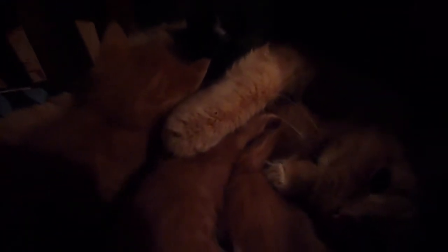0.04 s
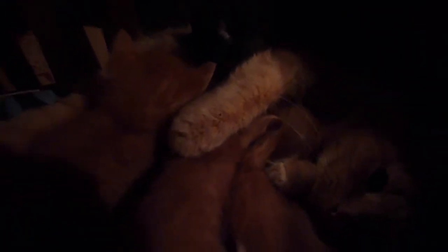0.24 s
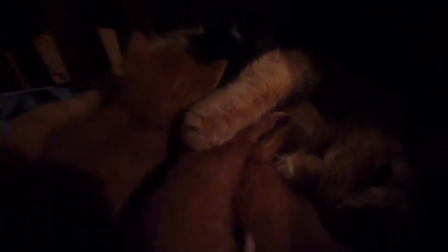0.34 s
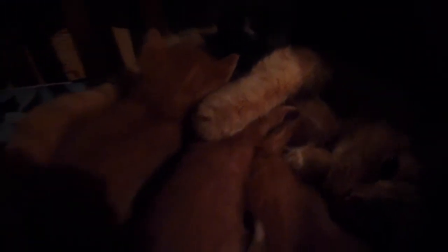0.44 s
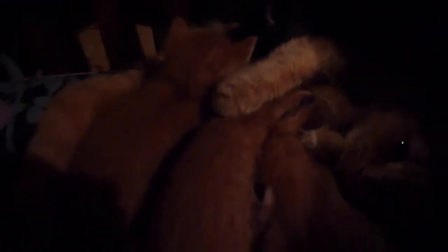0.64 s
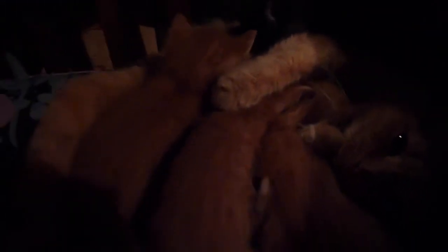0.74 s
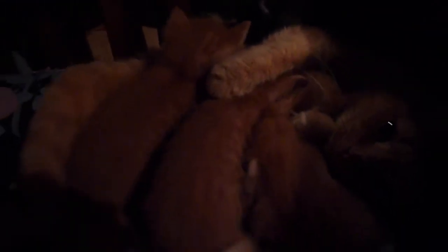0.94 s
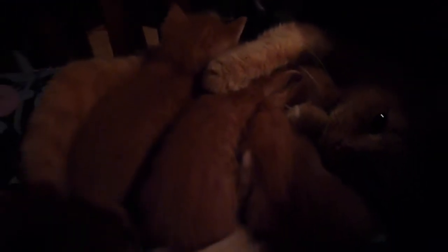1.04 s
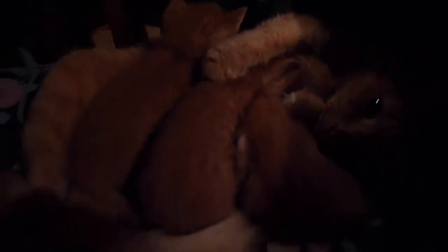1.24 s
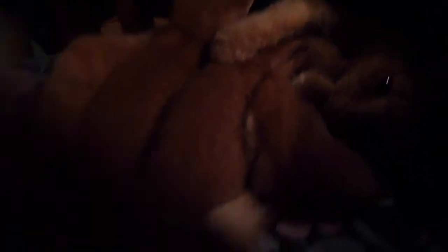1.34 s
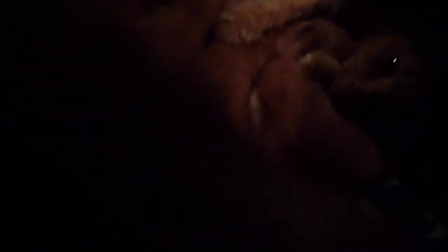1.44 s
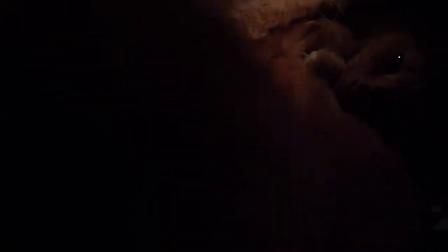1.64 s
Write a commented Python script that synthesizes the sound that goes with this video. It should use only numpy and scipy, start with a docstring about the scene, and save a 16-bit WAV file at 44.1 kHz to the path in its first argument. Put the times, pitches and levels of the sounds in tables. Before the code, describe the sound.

A kitten's single high mew starts at about 0.2 s with a slight click and hoarse edge, arches up by 0.45 s, then sinks and breaks off hoarsely near 0.83 s. A low pulsing purr runs throughout, stronger at 0-0.35 and 1.03-1.4 s, softer between and at the end. Wet mouth ticks dot it, sharpest at 1.22 s, with more near 1.53 s. Soft fur rustle and quiet indoor hiss lie beneath, close-miked.

```python
"""A quiet room: a kitten close to the microphone gives one clear, arching mew; a cat beside it purrs.
The mew is six partials on one pitch, hoarse at its onset and end. The purr is a slow train of double
larynx thuds whose sign flips between breathing out and in. Small mouth smacks are ticks and noise puffs
in wet cavities; random ringing grains make a soft rustle of fur and bedding, over coloured room hiss."""
import sys
import numpy as np
from scipy import signal
from scipy.fft import rfft, irfft
from scipy.io import wavfile

SR = 44100
rng = np.random.default_rng(int(sys.argv[2]) if len(sys.argv) > 2 else 0)


def store_wav(level_fs):
    """Save 16-bit WAV to argv[1]."""
    pcm = np.round(np.clip(np.atleast_2d(level_fs), -1, 1) * 32767)
    wavfile.write(sys.argv[1], SR, pcm.T.astype(np.int16))


def magnitude_from_level(level_db):
    """Linear magnitude for a level in decibels (20 dB per decade)."""
    exponent = np.asarray(level_db, float) / 20
    return 10 ** exponent


N = 74970


def column(rows, k):
    """Column k of a table whose first column is time, drawn as straight lines between its rows."""
    rows = np.array(rows, float)
    return np.interp(np.arange(N) / SR, rows[:, 0], rows[:, k])


def rms_one(x):
    """Scale to rms 1."""
    return x / np.sqrt(np.mean(x ** 2) + 1e-20)


def drift(hz):
    """Smooth random wander of rms 1: white noise through two equal one-pole low-passes at hz."""
    r = np.exp(-2 * np.pi * hz / SR)
    settle = 4000
    noise = rng.standard_normal(N + settle)
    return rms_one(signal.lfilter([1], [1, -2 * r, r * r], noise)[settle:])


def ring(x, hz, width_hz):
    """Two-pole resonance: a unit click rings as a dying sine, shorter for a greater width."""
    r = np.exp(-np.pi * width_hz / SR)
    w = 2 * np.pi * hz / SR
    return signal.lfilter([0, np.sin(w)], [1, -2 * r * np.cos(w), r * r], x + 1e-18)


def hiss():
    """Room hiss: steady Gaussian noise coloured by a fixed spectrum."""
    # room spectrum: (frequency [Hz], relative level per Hz [dB])
    room_colour = [(22, -22), (40, -4.5), (56, -1), (80, -24.5), (128, -6.5), (250, -9.5), (421, -7.5),
                   (656, -11.5), (1090, -13.5), (1960, -21), (4000, -26.5), (7070, -31), (8920, -43.5),
                   (10500, -63), (13600, -97.5)]
    rms_db = -46
    hz, db = np.transpose(room_colour)
    bins_hz = np.arange(N // 2 + 1) * SR / N
    shape = magnitude_from_level(np.interp(np.log(bins_hz + 1), np.log(hz), db))
    spectrum = rfft(rng.standard_normal(N)) * shape
    return magnitude_from_level(rms_db) * rms_one(irfft(spectrum, N))


def rustle():
    """Fur and bedding: random small grains of either sign, each ringing a few cycles."""
    # rustle strength: (time [s], level [dB])
    strength = [(0, -44.5), (.3, -44.5), (.55, -46.5), (.85, -43), (1.0, -46.5), (1.2, -44), (1.45, -50),
                (1.7, -46)]
    # grain colours: (ring frequency [Hz], relative level [dB])
    grain_rings = [(220, 0.5), (280, -1), (350, -7), (430, 0), (510, -0.5), (820, 0.5), (950, 3),
                   (1080, 3.5), (1220, -1), (1380, -5), (1600, -10.5), (1900, -12)]
    grains_per_s, cycles = 400, 9.3
    sizes = magnitude_from_level(2.63 * np.minimum(rng.exponential(1, N), 4)) * rng.choice([-1, 1], N)
    born = rng.random(N) < grains_per_s / SR
    dealt = rng.integers(0, 12, N)  # which of the twelve colours
    grains = np.zeros(N)
    for k, (hz, db) in enumerate(grain_rings):
        width_hz = hz / cycles * 2
        clicks = sizes * born * (dealt == k)
        # two rings in a row soften the onset
        grains += ring(ring(clicks, hz, width_hz), hz, width_hz) * hz * magnitude_from_level(db)
    return magnitude_from_level(column(strength, 1)) * rms_one(grains)


def purr():
    """Each larynx cycle gives two thuds through throat, chest and nose; their sign flips with the breath."""
    # one row per run of thuds; the third and fourth runs share one outward breath: (first thud [s],
    # thuds [count], period [s], period growth per thud [s], second thud after the first [s])
    runs = [(.014, 11, .038, .00026, .0118), (.4396, 15, .0376, -.00007, .0086), (1.007, 1, .038, 0, .0122),
            (1.0348, 13, .038, 0, .0122), (1.5238, 5, .0365, 0, .0086)]
    # one entry per run: (breathing out [true/false])
    outward_runs = (True, False, True, True, False)
    # purr strength: (time [s], level [dB], second thud relative to the first [dB])
    strength = [(0, -30, -21), (.06, -25, -4.5), (.13, -29, -5.5), (.25, -27.5, -14.5), (.33, -30, -10),
                (.37, -39, -1), (.44, -35, -6.5), (.6, -35.5, -3.5), (.68, -38, -1), (.8, -36, -5.5),
                (.86, -37, 0), (.89, -35.5, -11), (.96, -33, -7.5), (1.01, -37.5, -2), (1.03, -29, -9),
                (1.12, -28.5, -0.5), (1.2, -29, -9.5), (1.34, -28.5, -14), (1.42, -33, -21),
                (1.5, -35, -16), (1.53, -43, 9.5), (1.57, -39, 5.5), (1.65, -43, 10), (1.7, -32, -5)]
    # thud colour: (low edge [Hz], high edge [Hz], chest ring [Hz])
    out_thud, in_thud = (130, 460, 170), (125, 390, 135)
    jitter_s, spread_db = .0002, .6  # standard deviations; the second thud's level varies twice as much
    chest_width_hz, chest_db = 52, -5.5
    nose_hz, nose_width_hz, nose_db = 420, 300, -21

    out = np.zeros(N)
    level = magnitude_from_level(column(strength, 1))
    second_db = column(strength, 2)
    unit = np.eye(1, 2000)[0]  # a single click, to find the throat's peak
    for (start, count, period, growth, gap), outward in zip(runs, outward_runs):
        sign = 1 if outward else -1
        low_hz, high_hz, chest_hz = out_thud if outward else in_thud
        k = np.arange(count)
        luck = rng.standard_normal((count, 4))
        times = start + period * k + growth * k * k / 2

        clicks = np.zeros(N + SR)
        first = ((times + jitter_s * luck[:, 0]) * SR).astype(int)
        clicks[first] = magnitude_from_level(spread_db * luck[:, 1])
        second = ((times + gap + jitter_s * luck[:, 2]) * SR).astype(int)
        clicks[second] = magnitude_from_level(second_db[np.minimum(second, N - 1)] + 2 * spread_db * luck[:, 3])
        push = sign * clicks[:N] * level + 1e-18

        low_pass = signal.butter(8, high_hz, fs=SR, output="sos")
        high_pass = signal.butter(2, low_hz, "high", fs=SR, output="sos")
        throat = np.vstack([low_pass, high_pass])
        out += signal.sosfilt(throat, push) / signal.sosfilt(throat, unit).max()
        out += magnitude_from_level(chest_db) * ring(push, chest_hz, chest_width_hz)
        out += magnitude_from_level(nose_db) * ring(signal.sosfilt(low_pass, push), nose_hz, nose_width_hz)
    return out


def smacks():
    """Mouth smacks: a tick plus a dying noise puff ring a small wet cavity."""
    # smacks and ticks: (time [s], peak level [dB], cavity ring [Hz], puff's 60 dB decay [s])
    mouth_ticks = [(0.149, -34.5, 1240, .02), (0.2, -32, 1200, 0.0031), (0.192, -35.5, 4000, .004),
                   (0.2, -25, 1080, 0.029), (0.55, -32, 810, 0.011), (0.677, -28, 647, 0.026),
                   (.885, -32.5, 870, 0.035), (0.931, -34, 1188, 0.027), (1.021, -42, 740.7, 0.0089),
                   (1.2169, -22, 1020, 0.016), (1.2174, -25.5, 1860, 0.015), (1.217, -35, 3670, 0.016),
                   (1.2246, -29.5, 5550, 0.016), (1.2244, -36, 5000, 0.007), (.1985, -33, 2320, 0.011),
                   (1.2185, -32, 2200, 0.0068), (0.547, -47, 1330, 0.016), (.548, -27.5, 510, 0.055),
                   (1.2238, -31, 4440, 0.012), (1.2472, -30.5, 1400, 0.0074), (.81, -38, 2340, .03),
                   (0.79, -43, 2500, 0.06), (0.795, -42.5, 3300, 0.022), (0.841, -28, 798, .015),
                   (0.859, -37, 1270, 0.071), (1.642, -34, 410, 0.022), (1.2465, -27, 2850, 0.0027),
                   (1, -32, 3400, 0.0022), (1.2174, -49, 4400, .004), (0.88, -34, 4100, .004),
                   (1.281, -30, 1300, .012), (1.286, -35, 1000, 0.011), (1.295, -36, 2200, 0.004),
                   (1.436, -37, 1280, 0.044), (1.528, -30, 555.6, 0.017), (1.547, -28.5, 740.7, 0.0054)]
    out = np.zeros(N + SR)
    t = np.arange(2000) / SR
    puffs = rng.standard_normal((len(mouth_ticks), len(t)))
    for (s, db, hz, t60), noise in zip(mouth_ticks, puffs):
        push = 0.1 * noise * magnitude_from_level(-60 * t / t60) - (t == 0)
        soft = signal.lfilter([.5, .5], [1, -.4], push)
        pop = ring(soft, hz, 2.24 / t60 * 2.6)  # the cavity dies about 2.6 times faster than the puff
        start = int(s * SR)
        out[start:start + len(t)] += magnitude_from_level(db) * pop / np.abs(pop).max()
    return out[:N]


def mew():
    """Six partials on one arching pitch; random pitch and level wander make its onset and end hoarse."""
    # partials 1 to 5: (time [s], level of the 1st, 2nd, 3rd, 4th, 5th [dB])
    partials = [(0.2, -38, -62.5, -73, -73, -91), (0.206, -31, -43.5, -54, -68, -67),
                (0.218, -33.5, -42.5, -58, -65.4, -62), (0.232, -33, -41.5, -65, -71, -63.6),
                (0.246, -28.5, -40, -65, -82, -63), (0.26, -28, -34, -54, -64.8, -70),
                (0.285, -31.5, -34.5, -58, -62.2, -72), (0.305, -28.5, -31, -69, -60, -60),
                (0.33, -28, -29.5, -64, -56.5, -58), (0.355, -29.5, -32.5, -52.5, -55, -67.5),
                (0.38, -28, -27.5, -52, -50, -67), (0.405, -29.5, -24, -49, -51, -56),
                (0.425, -27.5, -18.5, -46.5, -48.5, -60), (0.44, -30.5, -20.5, -50, -49.5, -53.5),
                (0.47, -27.5, -16.5, -44.5, -49.0, -60), (0.51, -29, -17.5, -45.8, -50, -57),
                (0.53, -27.5, -22, -47, -47.5, -62.5), (0.545, -27, -18.5, -46.5, -49, -60),
                (0.57, -27.0, -20.5, -45.5, -50, -64), (0.6, -25, -22, -51.5, -54, -89),
                (0.64, -22, -25.5, -49, -53, -73.5), (0.68, -22, -26, -57, -61.5, -76),
                (0.7, -23.5, -32, -55, -59.5, -77), (0.73, -20.5, -30.1, -54.9, -69, -91.9),
                (0.765, -20.8, -31, -56, -65.5, -80.5), (0.79, -24, -35, -55, -72, -92.9),
                (0.805, -26.5, -33, -49.5, -74, -96), (0.815, -24, -40, -60, -77.4, -93),
                (0.823, -33, -44, -44, -76, -90.9), (0.83, -29.5, -57, -47, -73.2, -89.7)]
    # sixth partial: (time [s], level [dB])
    sixth = [(.2, -68), (.25, -64), (.3, -79), (.4, -68), (.46, -72), (.52, -78), (.6, -80), (.66, -67.5),
             (.72, -75.5)]
    # mew pitch: (time [s], frequency [Hz])
    pitch = [(.2, 850), (.208, 885), (.218, 924), (.246, 1016), (.26, 1028), (.285, 1066), (.305, 1111),
             (.33, 1111), (.355, 1120), (.405, 1180), (.425, 1191), (.47, 1195), (.51, 1189), (.53, 1167),
             (.545, 1171), (.57, 1163), (.6, 1139), (.68, 1080), (.7, 1057), (.73, 1039), (.765, 1000),
             (.805, 911), (.812, 940), (.817, 920), (.821, 835), (.833, 780)]
    # hoarseness: (time [s], pitch jitter [share of the pitch], shimmer per partial number [dB])
    hoarseness = [(.2, .015, .8), (.215, .002, .2), (.23, .0008, .15), (.5, .0006, .1), (.56, .001, .2),
                  (.785, .0008, .15), (.8, .025, 1.2), (.83, .04, 1.6)]
    attack_s, release_s = 0.001, .003
    t = np.arange(N) / SR
    pitch_hz = column(pitch, 1) * (1 + column(hoarseness, 1) * drift(250))
    phase = 2 * np.pi * np.cumsum(pitch_hz) / SR
    opening = np.clip((t - partials[0][0]) / attack_s, 0, 1)
    closing = np.clip(1 - (t - partials[-1][0]) / release_s, 0, 1)
    shimmer = column(hoarseness, 2) * drift(140)
    levels = [column(partials, k) for k in range(1, 6)] + [column(sixth, 1)]
    voice = np.zeros(N)
    for k, db in enumerate(levels, 1):
        voice += magnitude_from_level(db + k * shimmer) * np.cos(k * phase)
    return opening * closing * np.sqrt(2) * voice  # root 2 makes the levels rms


def scene():
    """All sources at the microphone, one channel."""
    return (hiss() + rustle() + purr() + smacks() + mew())[None]


def band_limit(x):
    """A steep low-pass at the top of the band."""
    return signal.sosfilt(signal.butter(12, 10700, fs=SR, output="sos"), x)


def record(dry):
    """A slow converter mirrors the treble about half its rate; bass and top are cut; zero is offset."""
    converter_hz, mirror_db = 16000, -4.5
    cutoff_hz, bass_cut_hz = 10700, 84
    offset = -.0065  # share of full scale
    flipped = dry * np.cos(2 * np.pi * converter_hz * np.arange(N) / SR)
    above_half = signal.butter(8, converter_hz / 2, "high", fs=SR, output="sos")
    mirror = signal.sosfilt(above_half, flipped)
    top_cut = signal.cheby2(10, 50, cutoff_hz, fs=SR, output="sos")
    bass_cut = signal.butter(2, bass_cut_hz, "high", fs=SR, output="sos")
    edges = np.vstack([top_cut, bass_cut])
    mix = signal.sosfilt(edges, dry + magnitude_from_level(mirror_db) * mirror) + offset
    return band_limit(mix)


dry = scene()
out = record(dry)
store_wav(out)
```